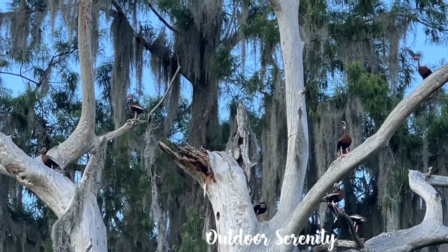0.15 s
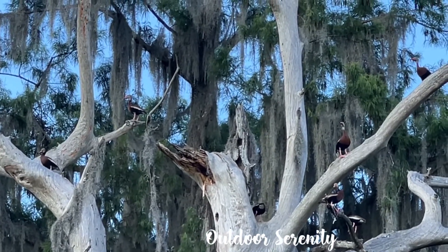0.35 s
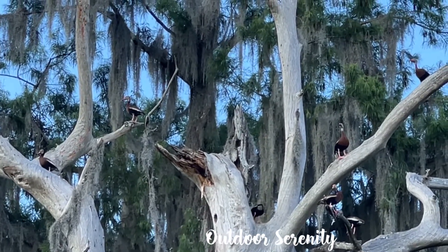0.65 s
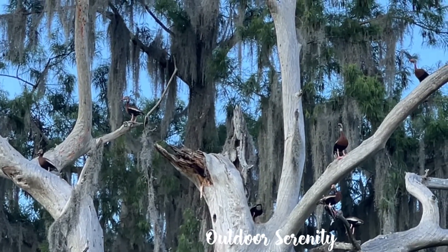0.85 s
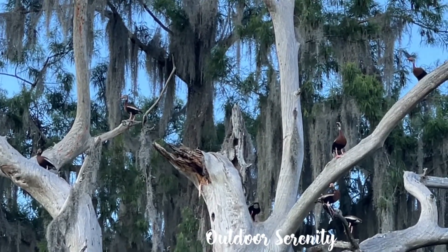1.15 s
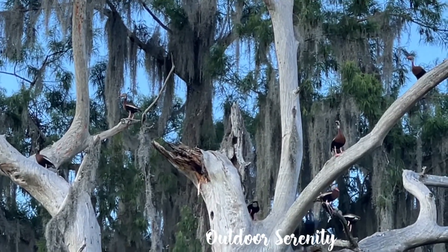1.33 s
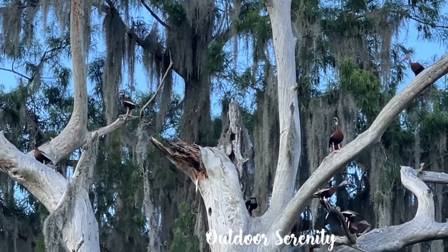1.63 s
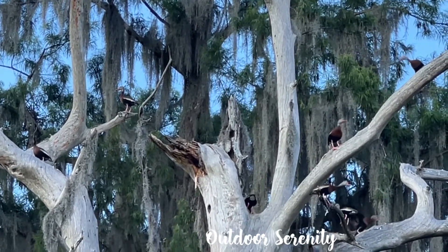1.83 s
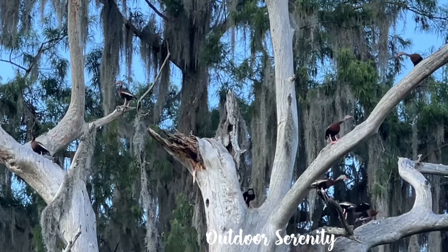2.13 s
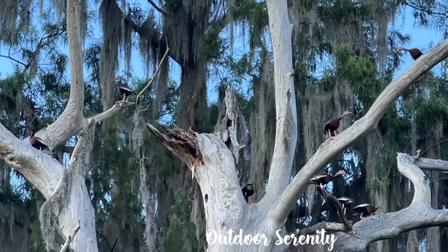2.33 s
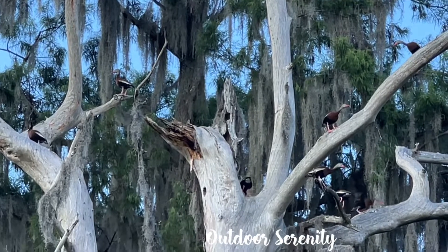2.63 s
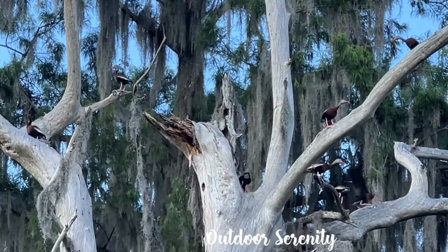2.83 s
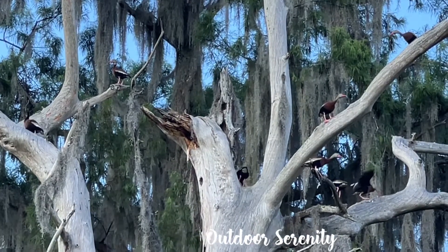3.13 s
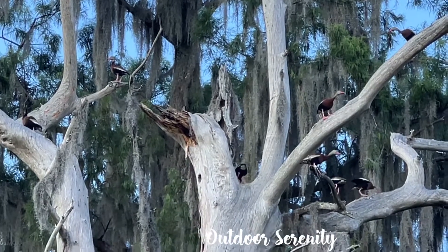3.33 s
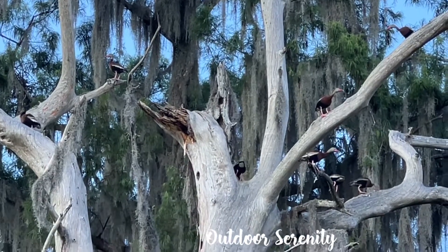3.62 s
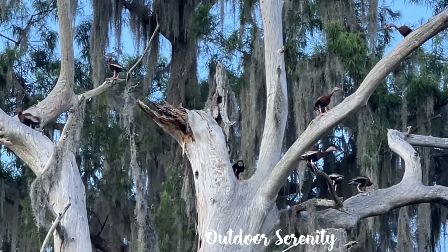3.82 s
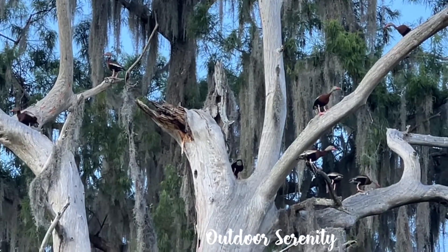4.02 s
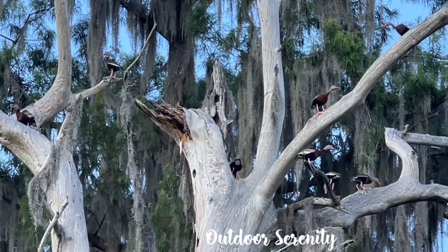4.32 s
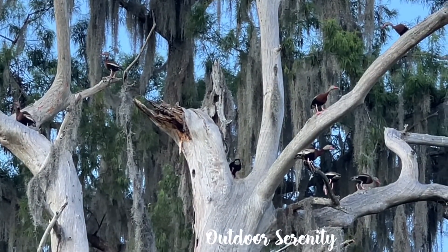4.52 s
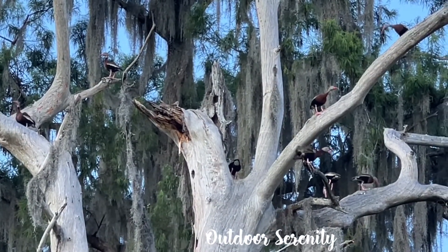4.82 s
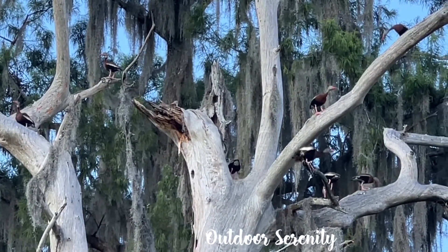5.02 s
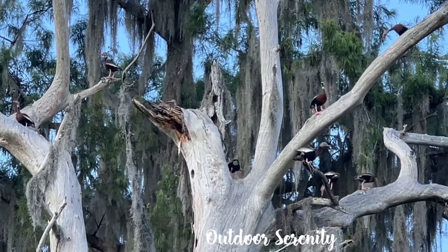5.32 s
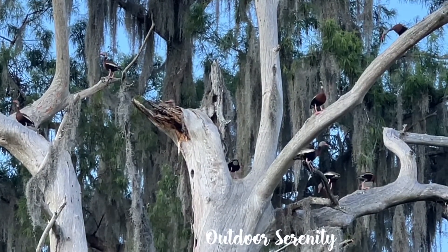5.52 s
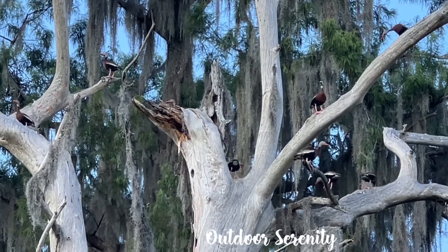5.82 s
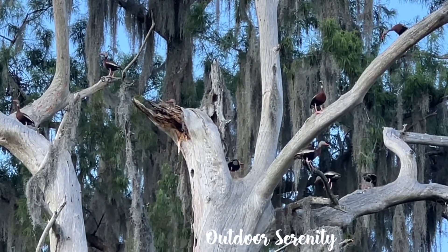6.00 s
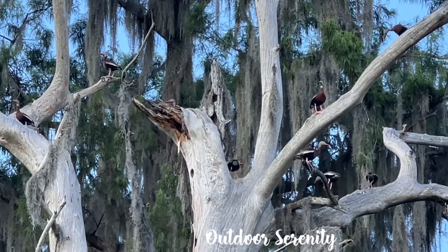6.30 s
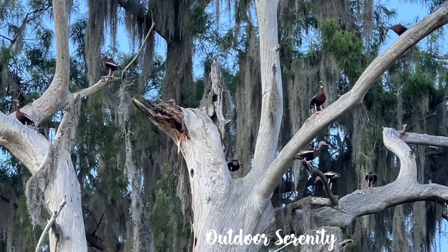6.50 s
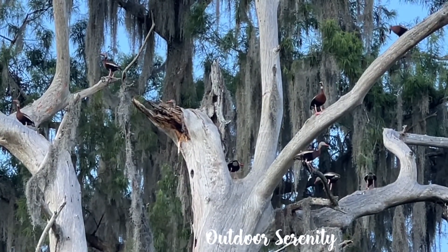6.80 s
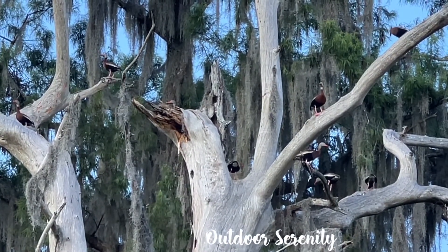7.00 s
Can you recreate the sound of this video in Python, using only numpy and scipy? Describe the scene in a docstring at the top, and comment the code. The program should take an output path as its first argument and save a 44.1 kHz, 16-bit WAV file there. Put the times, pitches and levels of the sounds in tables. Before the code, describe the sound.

A stereo outdoor scene with ducks perched in tall trees. From 0 to about 2.6 seconds, whistling ducks call densely: very short, arched peeps around two to four kilohertz, some pure, some reedy, many overlapping, with fainter birds chattering behind. Longer, clear whistles swoop up and down near 0.8, 1.1, 1.8 and 2.1 seconds. A small broken squeak comes at 2.9, then calls become faint and sparse until a peep at 3.9. From 4.4 to 5.1 another flurry gathers, then loosens into scattered peeps, with a sharper high one near 6.1, thinning towards 7 seconds. Tree trunks scatter a short reverberant tail. Throughout, distant traffic gives a steady low rumble and soft airy hush; a low engine hum fades over the first few seconds. A thin insect trill and a very high, rapidly pulsed cicada buzz persist, the buzz growing slightly.

```python
"""A flock of whistling ducks in tall trees peeps and whistles over one another.
Each note is a pitch that rises and falls, with a few overtones; the tree trunks scatter it into a short tail.
Fainter ducks chatter farther off, and cicadas buzz towards one side as a rapidly pulsed band of noise.
A narrower insect trill, also filtered noise, sits straight ahead.
Far traffic lies underneath: low rumble, wide airy noise and an engine note that fades."""
import sys
import numpy as np
from scipy import signal
from scipy.fft import rfft, irfft
from scipy.io import wavfile
from scipy.ndimage import uniform_filter1d

SR = 44100
rng = np.random.default_rng(int(sys.argv[2]) if len(sys.argv) > 2 else 0)


def persist_wave(psi):
    """Save psi, clipped to +-1, as 16-bit WAV."""
    counts = np.round(np.clip(psi, -1, 1) * 32767).astype(np.int16)
    wavfile.write(sys.argv[1], SR, np.atleast_2d(counts).T)


N = 315315  # samples in the scene
LEAD = SR // 2  # extra samples of chatter before the start, whose tail still hangs in the trees


def gain_of(db):
    """Turns decibels into a multiplying factor."""
    return 10 ** (np.asarray(db) / 20)


def evened(x):
    """Scales a sound to an average strength (rms) of 1."""
    return x / np.sqrt(np.mean(x ** 2) + 1e-20)


def read(points, hz):
    """Reads a spectrum table between its points, on a log-frequency axis."""
    point_hz, value = np.transpose(points)
    return np.interp(np.log(hz + 1), np.log(point_hz + 1), value)


def coloured(x, points, turn=((1, 0), (2, 0))):
    """Filters by a (Hz, dB) table and turns the phase by a (Hz, radians) table."""
    hz = np.fft.rfftfreq(len(x), 1 / SR)
    response = gain_of(read(points, hz)) * np.exp(1j * read(turn, hz))
    return irfft(rfft(x) * response, len(x))


def wander(count, per_s):
    """Makes a random drift of rms 1 by smoothing noise twice; a higher per_s drifts faster."""
    size = max(int(SR / per_s), 1)
    once = uniform_filter1d(rng.standard_normal(count), size)
    return evened(uniform_filter1d(once, size))


def level_at(t, points, drift_db=0):
    """Follows a (start_s, level_db) table over time, plus any drift, as a factor."""
    return gain_of(np.interp(t, *np.transpose(points)) + drift_db)


def add(mix, s, sound):
    """Mixes a sound in at a time, cutting off whatever falls outside."""
    at = round(s * SR)
    part = mix[max(at, 0):][:len(sound) + min(at, 0)]
    part += sound[max(-at, 0):][:len(part)]


# Low rumble of traffic, as a relative spectrum: pitch_hz, level_db (per Hz)
RUMBLE_SPECTRUM = [(12, -51), (20, -26), (24, -23), (35, -4), (65, 2.5), (91, 0), (113, -3.5), (200, -15),
                   (260, -33), (440, -120)]
# Airy noise ahead (mid), as a relative spectrum: pitch_hz, level_db (per Hz)
AIR_AHEAD = [(110, -39), (180, -4), (232, -4), (269, -7.5), (613, -11.5), (1480, -25), (1940, -33),
             (2180, -28), (2610, -31.5), (6400, -50), (8320, -86), (14100, -120)]
# Airy noise across (left against right), as a relative spectrum: pitch_hz, level_db (per Hz)
AIR_SIDEWAYS = [(18, -75), (30, -45), (84, -3), (161, -5), (236, -3), (309, -9), (694, -1.5), (1240, -14.5),
                (1670, -23.5), (6400, -66), (8320, -91), (14100, -120)]
# Slow swells, the air before its mid and side trims: start_s, rumble_level_db, air_level_db
TRAFFIC_SWELL = [(0, -53, -64.5), (2.3, -52, -62.5), (3.2, -53, -62.5), (7.15, -51, -62)]
# One far engine note, before its pitch and strength waver: start_s, pitch_hz, level_db
ENGINE_NOTE = [(0, 157, -58), (.3, 155, -57), (1.0, 156, -55), (1.5, 157, -61.5), (2.0, 158, -63.5),
               (3.0, 160, -69.5), (4.5, 160, -72), (7.15, 160, -80)]


def traffic():
    """Far traffic: shaped noise for rumble and air, and one wavering tone for an engine."""
    t = np.arange(N) / SR
    s, rumble_db, air_db = np.transpose(TRAFFIC_SWELL)
    rumble = gain_of(np.interp(t, s, rumble_db)) * evened(coloured(rng.standard_normal(N), RUMBLE_SPECTRUM))
    ahead = gain_of(1.5) * evened(coloured(rng.standard_normal(N), AIR_AHEAD))
    sideways = gain_of(-0.5) * evened(coloured(rng.standard_normal(N), AIR_SIDEWAYS))
    air = gain_of(np.interp(t, s, air_db)) * np.array([ahead, sideways])

    s, hz, db = np.transpose(ENGINE_NOTE)
    pitch_hz = np.interp(t, s, hz) + 3.53 * wander(N, 17.4)
    turns = np.cumsum(pitch_hz) / SR
    throb_db = 2.2 * wander(N, 14)
    engine = np.sqrt(2) * gain_of(np.interp(t, s, db) + throb_db) * np.sin(2 * np.pi * turns)
    return air + np.array([rumble + engine, gain_of(-12.5) * engine])


# Slow loudness of the trill, before its throbs: start_s, level_db
TRILL_LEVEL = [(0, -65.5), (3, -73), (4.2, -70.5), (5.9, -71.5), (7.15, -72.5)]
# Narrow band of the trill, as a relative spectrum: pitch_hz, level_db (per Hz)
TRILL_SPECTRUM = [(6200, -32), (6550, -16), (6750, 5.5), (7150, 4.5), (7350, -4), (7600, -37)]


def trill():
    """An insect's scraping straight ahead: a narrow band of noise in uneven throbs."""
    throb = level_at(np.arange(N) / SR, TRILL_LEVEL, 1.3 * wander(N, 120))
    return throb * evened(coloured(rng.standard_normal(N), TRILL_SPECTRUM))


# Band of the cicadas' buzz, as a relative spectrum: pitch_hz, level_db (per Hz)
CICADA_SPECTRUM = [(7000, -50), (7600, -60), (8000, -30), (8700, -13.5), (9300, -5.5), (10000, 1),
                   (10500, -6), (10900, -16.5), (11500, -39)]
# How far the left is ahead of the right (negative: behind): pitch_hz, phase_radians
CICADA_LEFT_LEAD = [(8000, 0), (8500, -.2), (9130, -1.9), (10200, -3.14), (10700, -3.7)]
# Slow loudness of the buzz, before a small drift: start_s, level_db
CICADA_LOUDNESS = [(0, -59.5), (2, -58.5), (3.5, -55.5), (5, -56.5), (7.15, -53)]
CICADA_PER_S = 138.5  # pulses a second, before a slight drift


def cicadas():
    """Noise pulsed by two drums that buckle in turn; it reaches left and right out of step."""
    t = np.arange(N) / SR
    turns = CICADA_PER_S * t + .1 * wander(N, 2)
    # the half-rate part makes every other pulse stronger
    beat = (1 + .27 * np.cos(2 * np.pi * turns) + .17 * np.cos(np.pi * turns)
            + .15 * np.cos(4 * np.pi * turns))
    rasp = beat * rng.standard_normal(N)
    right_turn = [(hz, -angle) for hz, angle in CICADA_LEFT_LEAD]
    left = evened(coloured(rasp, CICADA_SPECTRUM))
    right = evened(coloured(rasp, CICADA_SPECTRUM, right_turn))
    # a little separate noise makes the two sides less alike
    blur = evened(coloured(beat * rng.standard_normal(N), CICADA_SPECTRUM))
    level = level_at(t, CICADA_LOUDNESS, 1.0 * wander(N, 3.1))
    return level * np.array([left + 0.083 * blur, right - 0.04 * blur])


def voice(hz, stack, shake=0.0028, flutter_db=2.5, rasp=0.21):
    """Overtones on a pitch curve, slightly unsteady, with turbulence spreading noise around each."""
    turns = np.cumsum(hz * (1 + shake * wander(len(hz), 440))) / SR
    breath = gain_of(flutter_db * wander(len(hz), 226)) + rasp * wander(len(hz), 2500)
    return breath * sum(gain_of(db) * np.sin(2 * np.pi * k * turns + k * k) for k, db in stack)


def peep(arch, stack):
    """The pitch swings up to a top and drops away, losing strength as it leaves the top."""
    top_s, top_hz, rise, start, fall, end, abrupt = arch
    t = np.arange(-rise, fall, 1 / SR)
    rising = 1 - (1 - start) * (t / rise) ** 2
    falling = 1 - (1 - end) * abs(t / fall) ** abrupt
    share = np.where(t < 0, rising, falling)  # pitch as a share of the top
    edges = np.sin(np.pi / 2 * np.clip(np.minimum((t + rise) / .014, (fall - t) / .009), 0, 1)) ** 2
    slack = gain_of(-32 * (1 - share))  # dB lost per share of pitch below the top
    return top_s - rise, edges * slack * voice(top_hz * share, stack)


# Loudness of the distant ducks, before the bill and trees: start_s, level_db
FAR_FLOCK_LEVEL = [(0, -58), (1.0, -60.5), (1.55, -60), (2.2, -62), (2.4, -66), (2.99, -68), (3.3, -86),
                   (4.22, -86), (4.46, -64), (4.62, -57.5), (5.12, -68.5), (5.67, -68.5), (5.95, -72),
                   (6.31, -63), (7.15, -85)]
# Overtones of a distant peep, relative as the chatter is evened: overtone_number, level_db
FAR_OVERTONES = [(1, 5.4), (2, 5.4), (3, 5.4)]
FAR_PER_S = 51  # distant peeps a second


def far_flock():
    """Ducks farther off: peeps at random moments and pitches, already under way at the start."""
    out = np.zeros(LEAD + N)
    seconds = len(out) / SR
    for at, pitch, length, drop, size in rng.random((round(FAR_PER_S * seconds), 5)):
        rise_s, fall_s = .012 + .015 * drop, .016 + .02 * length
        end_share = .85 - 0.256 * drop
        arch = (at * seconds, 2100 + 1300 * pitch, rise_s, .8, fall_s, end_share, 2)
        s, sound = peep(arch, FAR_OVERTONES)
        add(out, s, gain_of(-12 * size) * sound)
    t = (np.arange(len(out)) - LEAD) / SR
    return level_at(t, FAR_FLOCK_LEVEL) * evened(out)


# How fast the tail among the trunks dies by 60 dB: pitch_hz, decay_s
TRUNK_DECAY = [(1500, 0.3), (3000, 0.33), (5000, 0.46), (9000, 0.47)]
# Filter on the tail's sideways part: pitch_hz, level_db
TRUNK_SPREAD = [(1500, -25), (3000, -14), (4500, -30), (7000, -66), (9000, -21)]


def wood(x):
    """Sparse reflections off trunks, each band dying at its own speed; one tail ahead, one across."""
    taps = np.zeros((2, SR))
    # one reflection at a random place in every 30 samples
    at = np.arange(300, SR - 30, 30) + rng.integers(0, 30, (2, (SR - 301) // 30))
    np.put_along_axis(taps, at, rng.standard_normal(at.shape), 1)
    hz, t, bands = signal.stft(taps, SR, nperseg=256)
    build = np.clip(t / 0.021, 0, 1) ** 2  # the nearest trunks are some metres away
    decay = gain_of(-60 * t / read(TRUNK_DECAY, hz)[:, None])
    tail = signal.istft(bands * build * decay, SR, nperseg=256)[1]
    tail = tail / np.linalg.norm(tail[0])
    mid, side = signal.fftconvolve(x[None], tail, axes=1)[:, LEAD:LEAD + N]
    return np.array([mid, coloured(side, TRUNK_SPREAD)])


# Long drawn whistles, one list each, before the bill: start_s, pitch_hz, level_db
LONG_WHISTLES = [
    [(0.735, 2970, -62), (0.745, 3390, -59), (0.815, 3660, -54.5), (0.879, 3390, -56.5), (0.891, 3070, -60),
     (0.925, 2110, -72)],
    [(1.03, 2120, -77), (1.042, 2730, -59), (1.062, 3380, -55), (1.104, 3540, -50), (1.168, 3410, -56),
     (1.2, 2660, -55)],
    [(1.705, 2060, -56), (1.732, 3250, -48), (1.75, 3500, -58), (1.769, 3990, -49), (1.819, 3940, -59),
     (1.833, 3570, -49), (1.875, 2900, -67)],
    [(1.965, 2094, -64), (1.989, 3720, -58), (2.031, 4270, -48.5), (2.093, 4324, -48.5), (2.199, 3920, -52),
     (2.227, 2970, -53), (2.245, 2180, -60)],
]


def whistle(rows):
    """A long, nearly pure note on a rounded pitch curve, with a faint octave."""
    s, hz, db = np.transpose(rows)
    t = np.arange(s[0], s[-1], 1 / SR)
    hz = uniform_filter1d(np.interp(t, s, hz), size=400, mode="nearest")
    shape = np.sqrt(2) * gain_of(np.interp(t, s, db)) * signal.windows.tukey(len(t), .08)
    overtones = [(1, 0.0077), (2, -22)]  # overtone number, dB
    return s[0], shape * voice(hz, overtones, shake=0.0025, flutter_db=1.4)


# A throat resonance takes (distance from its centre / width) squared in dB: widths below and above
THROAT_BELOW_HZ, THROAT_ABOVE_HZ = 940, 905
# The lowest voices beat strong-weak, so their odd overtones are faint
HALF_BELOW_HZ, HALF_DB = 1750, -11.5
# Pure peeps swoop up from far below their top, reedy ones set in near it, and a long rise starts lower:
# start pitch share, its change per overtone of throat centre, per s of rise and per kHz above 3 kHz
START_SHARE, START_PER_OVERTONE, START_PER_S, START_HIGH = .68, .14, -5.5, -0.1385
ABRUPT = 2.5  # power of time in the fall: higher holds the top, then drops


def near_peep(top_s, top_hz, rise, fall, end, db, centre):
    """A peep whose four overtones are weighted by a throat resonance."""
    k = np.arange(1, 5)
    width_hz = np.where(k < centre, THROAT_BELOW_HZ, THROAT_ABOVE_HZ)
    away = (k - centre) * top_hz / width_hz
    throat_db = -away ** 2 + HALF_DB * (k % 2) * (top_hz < HALF_BELOW_HZ)
    start = (START_SHARE + START_PER_OVERTONE * centre + START_PER_S * rise
             + START_HIGH * max(top_hz / 1000 - 3, 0))
    arch = (top_s, top_hz, rise, min(start, 1), fall, end, ABRUPT)
    return peep(arch, zip(k, db + throat_db - throat_db.max()))


# Near peeps, level of the strongest overtone before flutter and bill: top_s, top_pitch_hz, rise_s, fall_s,
# end_pitch (share of top), level_db, throat_centre (overtone number)
NEAR_PEEPS = [(.019, 2580, 0.011, .041, 0.5, -49, 2.2), (.079, 3585, 0.027, 0.031, 0.48, -45.5, 1.47),
              (.082, 3070, 0.029, 0.027, 0.93, -53.5, .4), (.155, 3020, .018, 0.028, 0.72, -57.5, .4),
              (.179, 1670, 0.021, 0.027, 0.55, -51.5, 1.6), (.212, 2536, 0.0083, 0.055, 0.45, -53.5, 2.9),
              (0.286, 2970, 0.019, 0.024, 0.98, -48.5, 1.1), (0.329, 3100, .024, .02, 0.86, -50, .6),
              (.318, 2360, 0.0095, 0.039, .6, -49, 2.5), (.385, 3105, 0.014, 0.012, 0.56, -49, .7),
              (.398, 2750, 0.015, 0.038, 0.61, -43, 2.1), (.504, 1670, .012, 0.03, .69, -53, 2.4),
              (0.509, 3140, .022, .016, 0.87, -48, 1.2), (.573, 2230, .01, 0.047, 0.69, -52.5, 2.5),
              (.578, 2490, .018, 0.027, 0.83, -50.5, 2.2), (0.579, 3150, .014, 0.016, .95, -53, .6),
              (.622, 2830, .016, .016, 0.94, -54, .6), (.685, 3060, .022, 0.02, 0.97, -50.5, .5),
              (.684, 3975, 0.042, 0.024, 0.54, -50.5, 1.5), (.686, 2942, 0.025, 0.027, 0.57, -44.5, 2.05),
              (.742, 3300, 0.019, 0.026, 0.78, -58, .6), (.755, 2600, 0.009, 0.033, 0.74, -55, 2.05),
              (.895, 2880, 0.017, .024, 0.57, -52, 2.05), (0.922, 2110, .004, .027, 1.6, -65, 2.2),
              (.973, 3236, .036, 0.038, .65, -51.5, 1.45), (.975, 2444, .018, .024, 0.73, -55.5, 2.05),
              (.975, 1613, .018, 0.019, 1.1, -58.5, .2), (1.02, 4050, .016, .024, 0.93, -51, 1.1),
              (1.03, 1590, 0.016, 0.024, 0.57, -50.5, 1.4), (1.087, 2540, 0.0093, 0.05, 0.87, -51.5, 2.27),
              (1.105, 2930, .014, .018, 0.88, -47, 1.75), (1.143, 1506, .018, 0.023, 0.68, -54, 1.4),
              (1.242, 2870, 0.019, 0.019, 0.79, -48, 1.8), (1.266, 3040, .017, 0.017, 1, -50.5, 1.35),
              (1.283, 3650, .008, .012, 1.05, -57, .7), (1.322, 2656, .008, .042, 0.72, -47.5, 2.25),
              (1.339, 3330, 0.023, 0.027, 0.84, -49.5, 1.1), (1.362, 2735, 0.018, 0.021, 1, -50, 2.1),
              (1.43, 3640, .008, 0.026, 0.81, -60.5, .9), (1.475, 3100, 0.023, 0.026, 0.5, -52, 1.3),
              (1.535, 2620, 0.008, .044, 0.8, -49.5, 2.1), (1.618, 3030, 0.031, .016, 0.69, -52, 1.05),
              (1.688, 2830, 0.018, 0.022, 0.66, -53, 1.9), (1.72, 2070, 0.017, 0.024, 1.1, -59, 2.9),
              (1.733, 2445, 0.035, .04, 0.63, -52.5, 2.3), (1.742, 3310, .019, 0.015, 0.89, -54, .4),
              (1.795, 2490, 0.018, 0.013, 0.81, -61, .3), (1.833, 2760, 0.026, 0.018, 0.77, -50.5, 2.1),
              (1.896, 2520, 0.021, .057, .73, -50.5, 2.23), (1.9, 3200, 0.018, 0.016, 0.9, -53.5, .4),
              (1.997, 3560, 0.023, 0.019, 0.89, -49.5, .6), (1.999, 3140, .01, .017, .98, -56, 2.05),
              (2.005, 2705, 0.023, 0.016, .9, -48.5, 2.1), (2.061, 2230, 0.028, 0.038, .78, -62.5, .2),
              (2.11, 3600, .016, .019, .99, -55, .7), (2.112, 2745, 0.024, 0.018, 0.98, -46.5, 1.9),
              (2.122, 3300, 0.043, 0.01, 0.78, -52, 1.1), (2.175, 2190, .017, 0.021, 1.12, -60, -.4),
              (2.212, 3480, .013, 0.029, 0.81, -46.5, 1.05), (2.226, 2660, .02, 0.023, 1.02, -48, 2.2),
              (2.228, 3640, 0.022, 0.023, 0.89, -52, .6), (2.264, 2550, 0.0093, 0.044, 0.73, -49, 2.3),
              (2.29, 2140, 0.021, 0.021, 0.97, -58.5, .2), (2.33, 2340, 0.016, 0.018, 0.96, -54, 2.9),
              (2.344, 2690, 0.023, 0.021, 0.97, -49.5, 2.1), (2.345, 3640, 0.019, 0.0158, 0.64, -49.5, .7),
              (2.421, 2120, .031, 0.0091, 0.55, -63.5, .2), (2.484, 2534, 0.0098, 0.047, 0.71, -51.5, 2.25),
              (2.597, 2270, 0.014, 0.049, 0.74, -54, 2.6), (2.605, 2704, 0.026, 0.046, 0.54, -45.5, 2.2),
              (2.604, 4180, 0.036, 0.02, 0.27, -60, .9), (2.782, 3160, 0.0072, 0.025, .93, -62.5, 1.4),
              (2.847, 1894, .01, .024, 0.98, -73, 1.2), (2.947, 2000, .019, .017, 0.93, -70, .4),
              (3.014, 2710, 0.025, 0.01, .61, -56.5, 1.95), (3.028, 2174, 0.0088, .034, 0.91, -60.5, 1.7),
              (3.143, 2035, 0.019, 0.016, 0.83, -67, 1.05), (3.236, 2080, 0.015, .025, 0.91, -66.5, 1.4),
              (3.29, 2720, .01, .02, .9, -74, 2.1), (3.3, 3500, 0.018, 0.018, 0.94, -76, .6),
              (3.465, 3560, 0.0091, 0.057, 0.9, -81, .6), (3.65, 2140, .015, 0.025, 0.93, -77, .6),
              (3.66, 3150, 0.0072, 0.032, 0.94, -77, .6), (3.889, 3610, 0.037, 0.0056, .95, -51, 1.1),
              (3.897, 2780, .006, .014, 0.79, -59, .4), (4.145, 2715, .014, 0.021, 0.65, -62, .7),
              (4.248, 2355, .014, .036, .62, -57.5, 2.1), (4.379, 2250, .01, 0.032, 0.94, -65, 1.8),
              (4.439, 2416, 0.0095, 0.045, 0.55, -49, 2.35), (4.444, 2780, 0.01, 0.04, 0.7, -45.5, 2.1),
              (4.518, 2530, 0.037, 0.015, 0.8, -57.5, 1.15), (4.583, 4470, 0.009, .035, 0.83, -62, .9),
              (4.584, 2960, 0.027, 0.032, 1.07, -51, 1.4), (4.61, 3250, 0.016, 0.025, 0.66, -48, 1.4),
              (4.708, 2210, .016, 0.024, 1.07, -61, .7), (4.735, 2140, 0.016, .04, 0.51, -54.5, 2.4),
              (4.735, 2840, .015, 0.036, 0.46, -56, 1.95), (4.749, 2790, .031, 0.0074, 0.96, -52, 1.6),
              (4.79, 3140, 0.03, 0.024, 0.61, -56.5, .5), (4.794, 2370, 0.012, 0.014, 1.4, -58, 1.5),
              (4.845, 3650, 0.015, 0.017, 0.93, -59, .8), (4.839, 2750, 0.043, 0.019, 0.94, -53.5, 2.1),
              (4.934, 2824, 0.02, 0.032, 0.73, -49.5, 1.98), (4.94, 2170, 0.014, 0.035, 0.94, -56, 2.3),
              (4.945, 1966, .02, .017, .7, -52.5, 2.9), (4.949, 3870, 0.021, .029, 0.65, -58, 1.4),
              (4.996, 2583, 0.013, 0.037, 0.58, -51, 2.15), (5.06, 2810, 0.015, 0.014, 0.87, -59, .8),
              (5.181, 2207, .015, 0.039, 0.54, -54, 2.5), (5.205, 2470, 0.013, .022, 0.62, -55.5, 1.9),
              (5.241, 2115, 0.015, 0.015, .94, -60, 1.2), (5.302, 2260, 0.0075, .045, 0.74, -57, 2.5),
              (5.33, 2170, .016, .02, .97, -58.5, 1.6), (5.352, 2800, 0.018, .015, .9, -66, .8),
              (5.398, 2210, 0.0064, 0.043, .65, -62.5, 2.5), (5.43, 2570, 0.011, 0.037, 0.71, -51.5, 2.05),
              (5.435, 2120, 0.014, 0.034, 0.79, -60.5, 1.3), (5.475, 2660, 0.014, 0.011, 0.98, -66, .6),
              (5.53, 2230, 0.0096, .041, 0.76, -55.5, 2.4), (5.645, 2080, .018, 0.021, 0.81, -65, 1.4),
              (5.69, 2460, .022, 0.017, 0.88, -58, 2.05), (5.722, 2257, .012, 0.046, 0.6, -51.5, 2.4),
              (5.792, 2394, 0.011, 0.047, 0.61, -54.5, 2.1), (6.02, 2000, .008, 0.03, 0.79, -69, 2.5),
              (6.097, 4160, .028, 0.03, 0.37, -48.5, 1.25), (6.1, 1740, .015, .015, 1, -65, .2),
              (6.216, 2160, 0.0078, .045, 0.64, -55, 2.7), (6.309, 3620, .03, .012, .92, -58.5, 1.2),
              (6.335, 2900, 0.015, 0.011, 0.77, -59.5, .6), (6.388, 2400, 0.015, 0.044, 0.9, -55, 2.2),
              (6.396, 2400, 0.011, 0.038, 0.46, -52, 2.6), (6.495, 2930, 0.02, 0.016, .82, -59, .5),
              (6.642, 2820, .012, 0.022, .79, -62, .95), (6.64, 2333, 0.018, 0.031, 0.57, -57, 2.3),
              (6.665, 2475, 0.025, 0.021, 0.85, -55, 2.05), (6.775, 2290, 0.024, 0.013, .99, -60, 2.2),
              (6.912, 3030, 0.023, 0.021, 0.7, -62.5, .8), (7.047, 2830, 0.027, .019, 1.04, -61.5, .3)]
# A squeak whose voice breaks into a dense stack: top_s, top_pitch_hz, rise_s, start_pitch (share of top),
# fall_s, end_pitch (share of top), fall_power (no unit)
SQUEAK_ARCH = (2.913, 1010, .022, .74, .02, .72, 2)
# The squeak's overtones, before flutter and bill: overtone_number, level_db
SQUEAK_OVERTONES = [(3, -55.5), (4, -46.5), (5, -56), (6, -47), (7, -51), (8, -61), (9, -49)]


def flock():
    """All the near ducks without the trees: peeps, long whistles and one squeak."""
    out = np.zeros(N)
    for row in NEAR_PEEPS:
        add(out, *near_peep(*row))
    for rows in LONG_WHISTLES:
        add(out, *whistle(rows))
    add(out, *peep(SQUEAK_ARCH, SQUEAK_OVERTONES))
    return out


# A small bill radiates little bass: pitch_hz, level_db
BILL_FILTER = [(1000, -1), (1600, 0), (2000, 2), (2600, 2), (11000, 0.5)]
# The ducks reach left and right slightly out of step, as a side signal a quarter turn from the mid:
# pitch_hz, level_db
DUCK_SIDE = [(1500, -42), (2500, -14.5), (3500, -9.5), (4500, -14.5), (5500, -23), (6200, -76), (8000, -39),
             (10000, 9)]


def scene():
    """Mixes a mid (shared) and a side (difference) layer, then folds them to left and right."""
    ducks = coloured(np.pad(flock(), (LEAD, 0)), BILL_FILTER)
    far = coloured(far_flock(), BILL_FILTER)
    mid, side = wood(gain_of(-7.5) * ducks + far) + traffic()
    birds = mid + (ducks + gain_of(-13) * far)[LEAD:]  # mid also holds the traffic
    quarter_turn = [(1, np.pi / 2), (2, np.pi / 2)]
    side = side + coloured(coloured(birds, BILL_FILTER), DUCK_SIDE, quarter_turn)
    mid = birds + trill()
    return np.array([mid + side, mid - side]) + cicadas()


def record(dry):
    """Limits the band: a steep low-pass filter removes what lies above about 11 kHz."""
    low_pass = signal.firwin(511, 11000, window=("kaiser", 9), fs=SR)
    return signal.oaconvolve(dry, low_pass[None], "same")


dry = scene()
out = record(dry)
persist_wave(out)
```